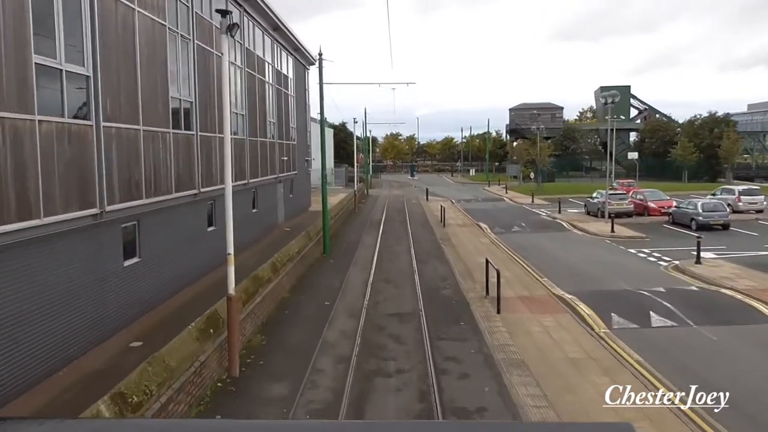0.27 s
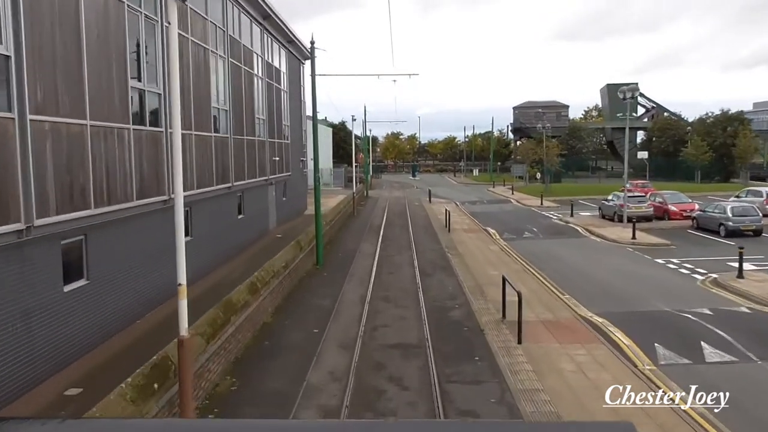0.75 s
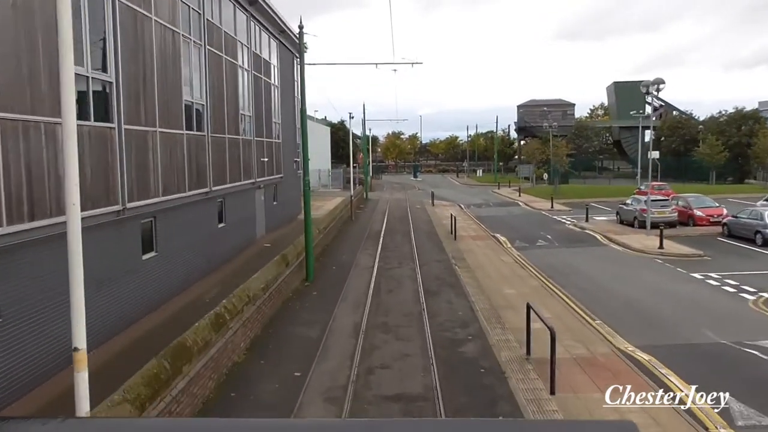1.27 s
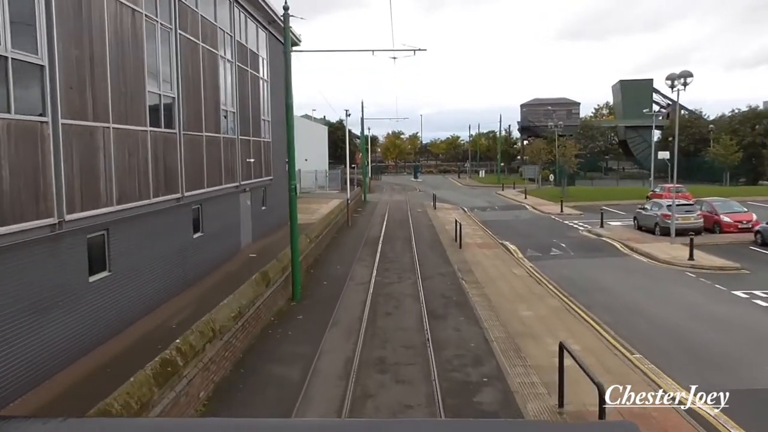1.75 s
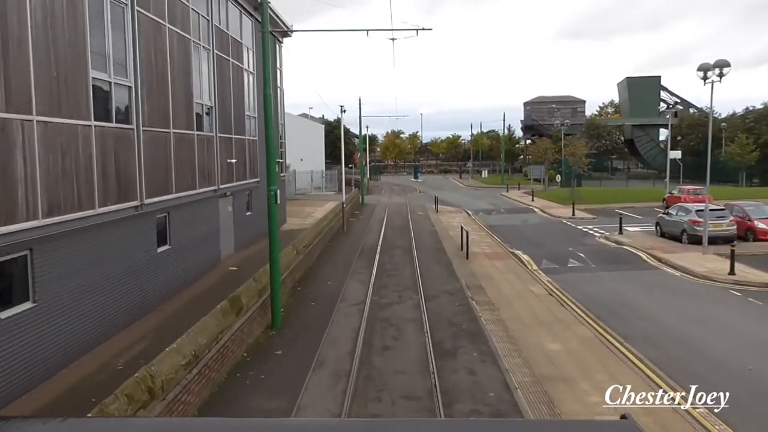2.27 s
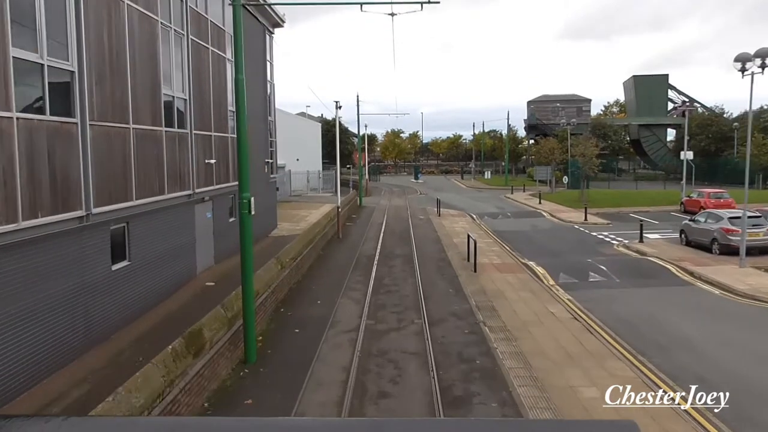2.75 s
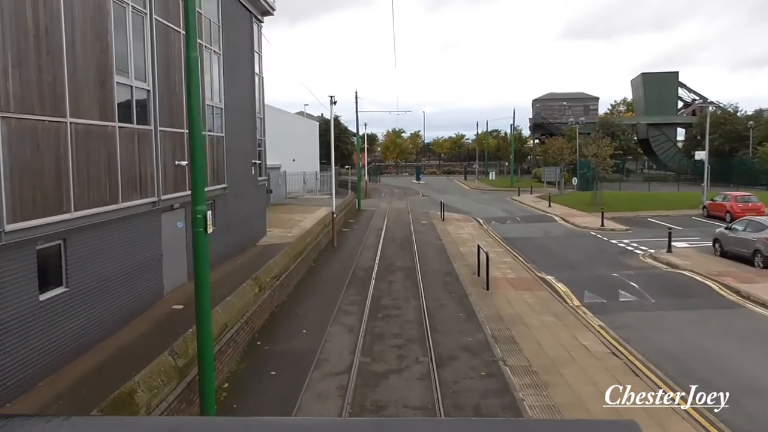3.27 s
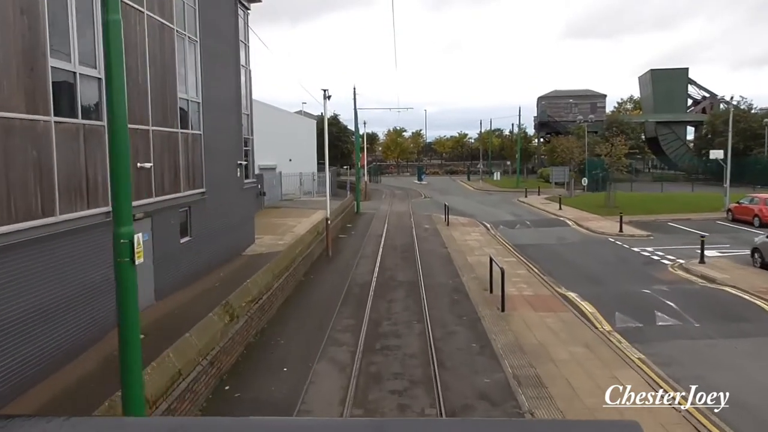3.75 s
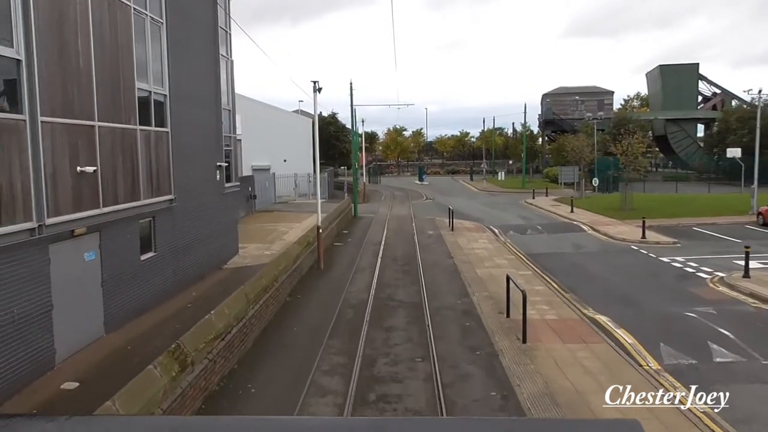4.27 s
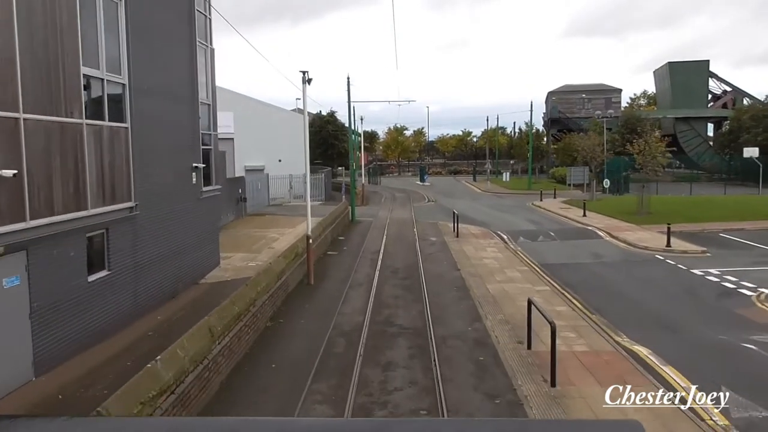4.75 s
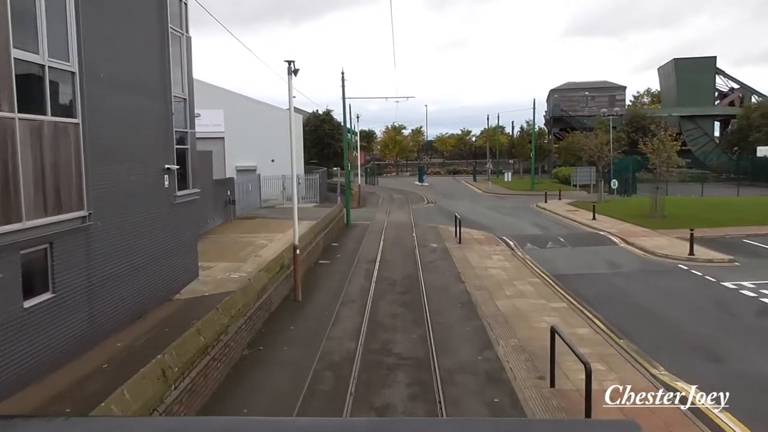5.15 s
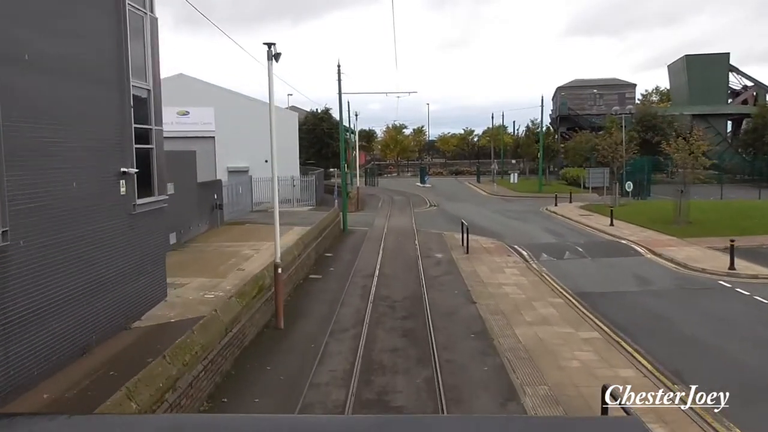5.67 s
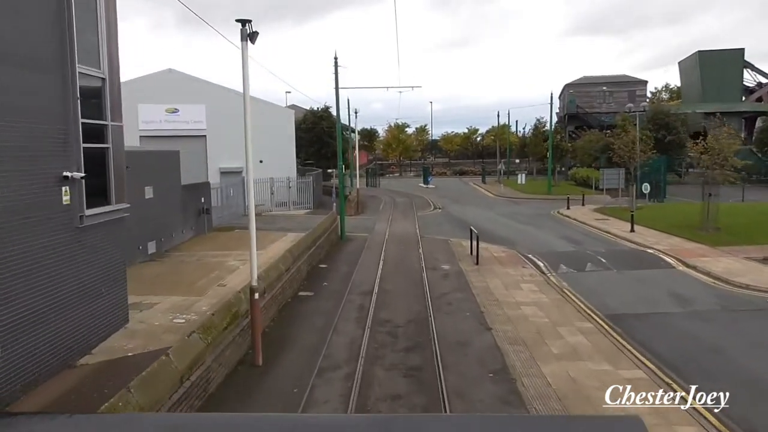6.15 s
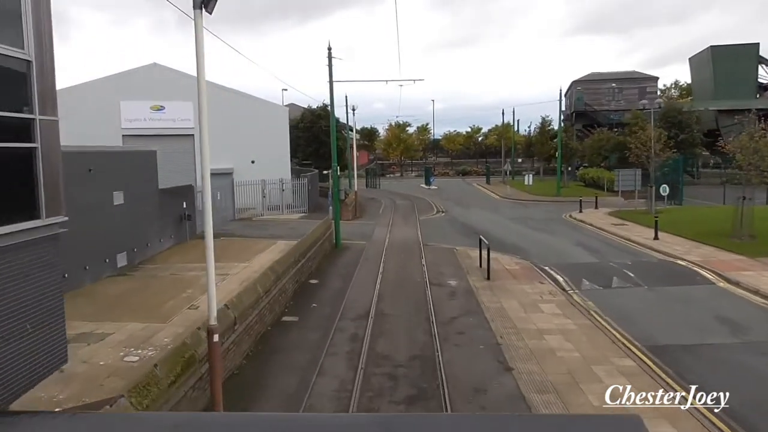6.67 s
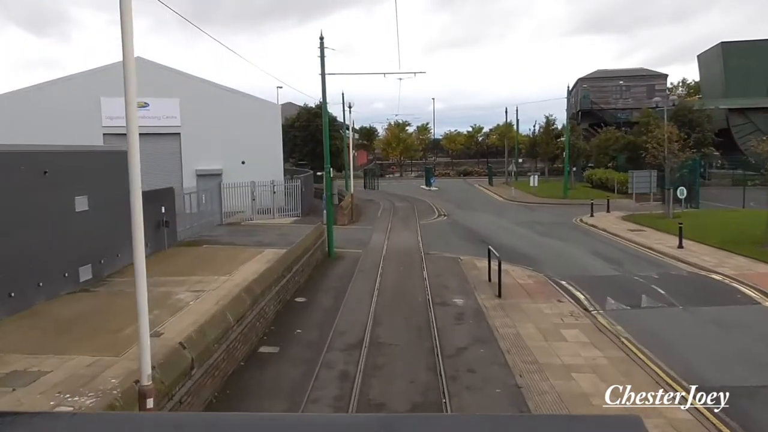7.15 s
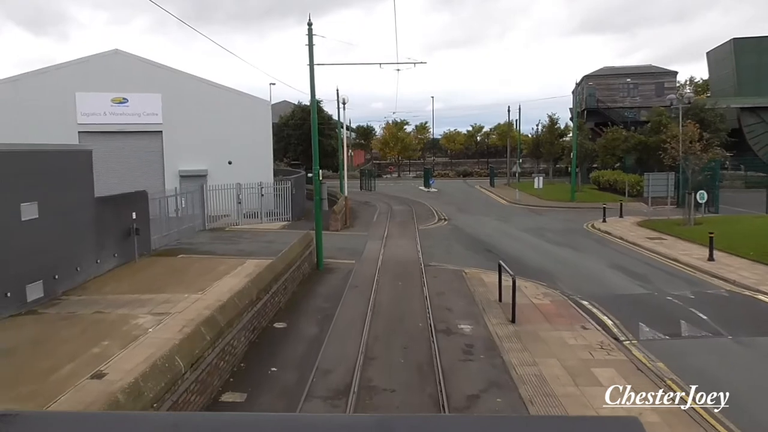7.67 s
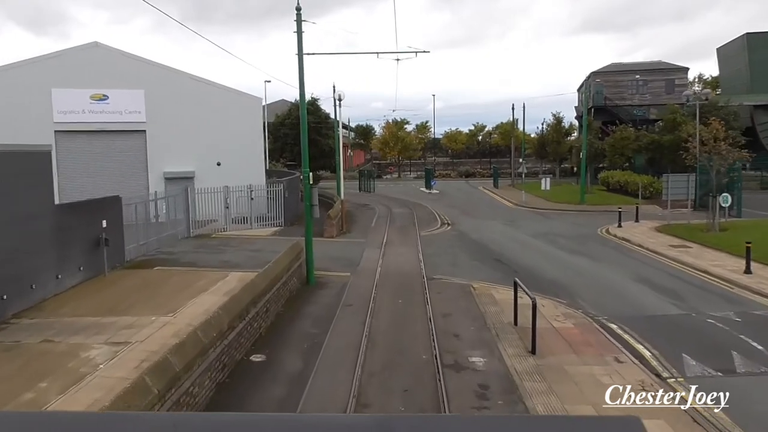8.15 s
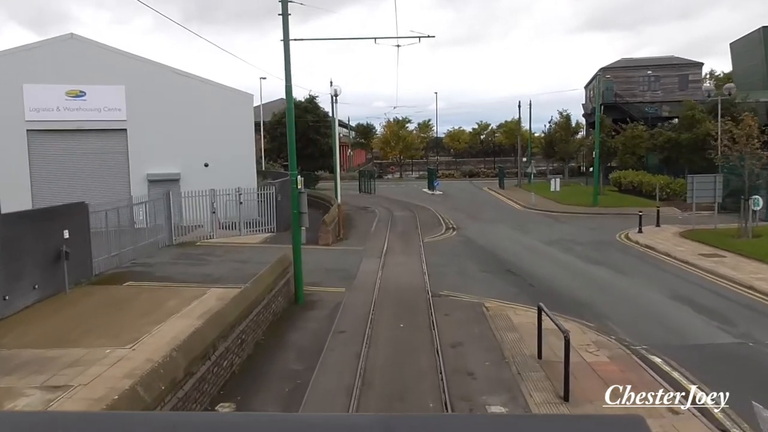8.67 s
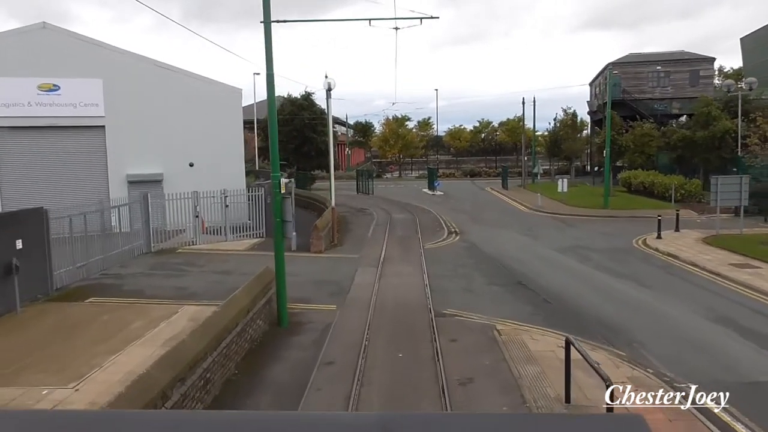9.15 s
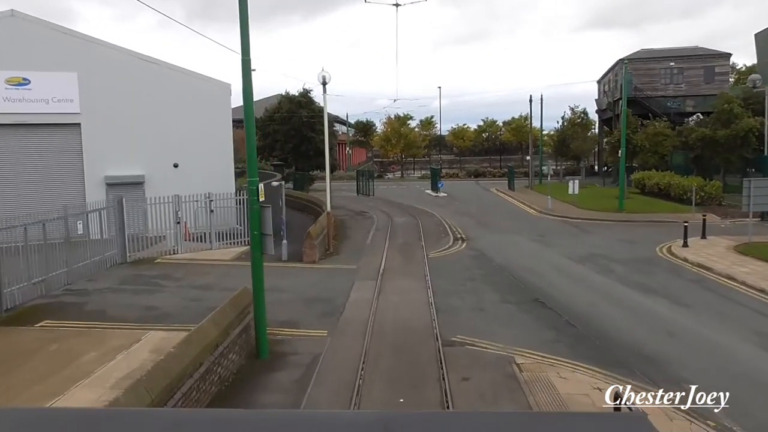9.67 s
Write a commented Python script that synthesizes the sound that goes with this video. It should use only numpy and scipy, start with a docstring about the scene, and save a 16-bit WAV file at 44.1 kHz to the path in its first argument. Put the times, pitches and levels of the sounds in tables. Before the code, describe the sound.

Aboard an electric tram on street track. A low, rough rumble and wheel roar run throughout under a thin hiss from flanges and overhead collector. Thumps come irregularly, with strong clattering jolts near one and a half, five and five and a half seconds. Brief hollow metal tones sing out. Near the end the rolling drops and a cluster of knocks follows. Close onboard microphone, mostly central, its level dipping after big jolts.

```python
"""On board an electric tram rolling along street track.
Rough rail shakes the truck (the wheel frame) and floor: boom, rumble, roar and ringing tones made from random clicks
and noise. Flanges and the current collector hiss, and the wire ticks. Bumps are short dying sine tones;
clatter and cracks are noise bursts; brief sliding tones stand out of the rolling noise.
Jolts swell the rolling sounds; after strong ones the recorder's automatic gain briefly lowers the level."""
import sys
import numpy as np
from scipy import signal
from scipy.fft import rfft, irfft, next_fast_len
from scipy.io import wavfile
from scipy.ndimage import uniform_filter1d

SR = 44100
rng = np.random.default_rng(int(sys.argv[2]) if len(sys.argv) > 2 else 0)


def wav_record(signal):
    """Record a signal, one row per channel, as 16-bit PCM in the file named by sys.argv[1]."""
    frames = np.transpose(np.atleast_2d(signal))
    bounded = np.clip(frames, -1, 1)
    # unit amplitude maps onto the largest positive 16-bit level
    quanta = np.round(bounded * 32767).astype(np.int16)
    wavfile.write(sys.argv[1], SR, quanta)


def to_linear_factor(level_db):
    """Convert decibel levels (scalar or array-like) to linear amplitude factors."""
    exponent = np.asarray(level_db, float) / 20
    return 10 ** exponent


N = 437472   # length in samples


def rms_one(x):
    """Scale to unit rms."""
    return x / np.sqrt(np.mean(x ** 2) + 1e-20)


def in_time(rows):
    """Turn each column of a time table into a curve, sample by sample."""
    s, *columns = np.transpose(rows)
    return [np.interp(np.arange(N) / SR, s, column) for column in columns]


def at_hz(points, hz):
    """Read a frequency table on a log-frequency axis."""
    table_hz, table_db = np.transpose(points)
    return np.interp(np.log(hz), np.log(table_hz), table_db)


def swell(t, s, db, length):
    """A bell-shaped change in level, in dB, centred on s."""
    return db * np.exp(-((t - s) / length) ** 2)


def drift(rate):
    """Slow random wandering of spread 1: noise through a two-pole low-pass at rate (Hz)."""
    r = np.exp(-80 * np.pi * rate / SR)   # worked out at every 40th sample
    noise = rng.standard_normal(N // 40 + 2002)
    slow = signal.lfilter([1], [1, -2 * r, r * r], noise)[2000:]
    return np.interp(np.arange(N) / 40, np.arange(len(slow)), rms_one(slow))


def grit(per_s, spread_db):
    """Tiny rough spots under a wheel or shoe: random clicks of uneven size."""
    sizes = to_linear_factor(spread_db * np.minimum(rng.exponential(1, N), 5)) * rng.standard_normal(N)
    hit = rng.random(N) < per_s / SR
    return sizes * hit


# How much weaker the stereo side is than the middle while the image is open: (f/Hz, level/dB)
SIDE_LEVEL = [(60, -28), (110, -24), (200, -23.5), (380, -42), (700, -37), (1290, -29), (2380, -12),
              (4400, -10), (8120, -10), (15000, -7)]


def coloured(draw, spectrum, patchy_db, rate, count=6, tilt_db=0):
    """Mid and side clicks shaped by a spectrum, in bands that flicker partly together; mid rms 1."""
    size = next_fast_len(N)
    hz = np.maximum(np.arange(size // 2 + 1) * SR / size, 1)
    low_hz, high_hz = spectrum[0][0], spectrum[-1][0]
    inside = (hz > low_hz) & (hz < high_hz)
    colour_db = at_hz(spectrum, hz)
    mid = rfft(draw(), size) * to_linear_factor(colour_db) * inside
    side = rfft(draw(), size) * to_linear_factor(colour_db + at_hz(SIDE_LEVEL, hz)) * inside
    place = np.log(hz / low_hz) / np.log(high_hz / low_hz) * (count - 1)
    out, together = 0, drift(rate)
    for k in range(count):
        share = np.clip(1 - abs(place - k), 0, 1)   # neighbouring bands overlap
        flicker_db = patchy_db * (0.5 * together + drift(rate))
        band_tilt_db = tilt_db * (k / (count - 1) - .5)
        band = irfft([mid * share, side * share], size)[:, :N]
        out = out + to_linear_factor(flicker_db + band_tilt_db) * band
    return out / np.sqrt(np.mean(out[0] ** 2))


def sung(modes, levels_db, steady=0., waver_db=0., rate=2.25, sag_per_s=0.):
    """Noise twice through each narrow mode; a driven mode holds its strength more steadily than free noise."""
    out, t = 0, np.arange(N) / SR
    for (hz, width, offset_db), level_db in zip(modes, levels_db):
        r = np.exp(-np.pi * width / SR)
        a = [1, -2 * r * np.cos(2 * np.pi * hz / SR), r * r]
        once = signal.lfilter([1, 0, -1], a, rng.standard_normal(N))
        tone = rms_one(signal.lfilter([1, 0, -1], a, once))
        # pitch sinks as the car slows
        tone = np.interp(t - .5 * sag_per_s * t * (t - t[-1]), t, tone)
        strength = np.sqrt(uniform_filter1d(tone ** 2, size=600) + 0.026)
        evened = rms_one(tone / strength ** steady)
        out = out + to_linear_factor(level_db + offset_db + waver_db * drift(rate)) * evened
    return out


def dying_puffs(rows, offset_db, t60_s, low_hz, high_hz):
    """Band-limited noise that starts at each table row and dies by 60 dB in t60_s."""
    envelope = np.zeros(N)
    for s, db in rows:
        envelope[round(s * SR)] = to_linear_factor(db + offset_db)
    envelope = signal.lfilter([1], [1, -to_linear_factor(-60 / (t60_s * SR))], envelope + 1e-18)
    band = signal.butter(2, [low_hz, high_hz], "band", fs=SR, output="sos")
    return envelope * rms_one(signal.sosfilt(band, rng.standard_normal(N)))


# Jolts from joints and rough spots, each with the recorder's gain reduction after it:
# (t/s, swell level/dB, length/s, gain reduction setting/dB; below 0 means none)
JOLTS = [(0.132, 1.5, 0.047, -4), (0.268, 4.5, 0.029, 3.5), (0.437, 4, 0.039, 2.5), (0.783, 3, 0.05, -2),
         (1.474, 4, 0.072, 12.5), (1.932, 5, 0.04, 3.5), (2.482, 3, 0.037, 3.5), (2.708, 0, 0.025, 4.5),
         (3.13, -0.5, .03, -3), (3.426, 3.5, 0.027, -0.5), (3.512, 5, 0.013, -3), (3.624, 6, 0.028, -1.5),
         (3.758, 3.5, 0.018, 5), (4.303, 0, .04, -2.5), (4.474, 1.5, 0.024, -1.5), (4.79, 1.5, .03, 0.5),
         (5.094, 1.5, 0.04, 2.5), (5.54, -1, 0.031, -2), (6.048, 5.5, 0.012, 1), (6.2, 3, 0.037, 2.5),
         (6.366, 3.5, 0.038, 0.5), (6.78, -2, 0.025, 2), (6.916, 3, 0.049, 2), (7.32, 2.5, 0.033, -1.5),
         (7.47, 3, 0.023, 2), (7.654, 2.5, 0.02, -3.5), (8.145, 1.5, 0.025, 2.5), (8.31, -1, 0.024, 1.5),
         (8.457, 0.5, 0.028, -2.5), (8.586, 2.5, 0.069, 4.5), (8.766, 3, 0.038, -2.5), (8.954, 5, 0.036, 3),
         (9.07, 6, 0.033, -1.5), (9.154, 2, 0.026, 6), (9.275, 10.5, 0.049, -1.5), (9.39, 7, 0.074, -3),
         (9.556, 1, .03, 0), (9.718, 5.5, 0.012, -4), (9.778, 7.5, 0.03, 4.5)]


def jolts_and_recorder_gain(recovery_s=0.16):
    """Jolts swell the rolling; the recorder's gain sinks as the swell ends and recovers slowly; both in dB."""
    up, down, t = 0, 0, np.arange(0, N / SR, 1e-3)
    for s, swell_db, length, reduction_db in JOLTS:
        after = np.maximum(t - s, 0)
        up = up + swell(t, s, swell_db, length)
        onset = 1 - np.exp(-(after / length) ** 2)
        down = down - max(reduction_db, 0) * onset * np.exp(-after / recovery_s)
    return in_time(np.c_[t, up, down])


# Rolling before jolts and recorder gain:
# (t/s, floor rumble level/dB, wheel roar level/dB, rumble tilt/dB, roar tilt/dB)
# A tilt runs from the lowest to the highest band.
ROLLING = [(0, -17, -26, -14, -14), (.3, -17, -28.5, -1, 0), (.6, -19.5, -30, 0, 3),
           (1.3, -17, -27.5, 2, 7), (2.2, -18, -29.5, -4, 1), (3.1, -15, -26, -9, -4),
           (3.7, -19.5, -33, 9, 14), (4.4, -19, -30.5, 0, 1), (5, -17.5, -28.5, -5, -6),
           (5.8, -17, -27.5, 2, 3), (6.6, -17, -28, -2, 2), (7.4, -17, -27, -12, -1),
           (8.2, -18, -28.5, 2.5, 0), (8.8, -17.5, -30.5, -12, -2), (9.3, -25, -39, 6, -18),
           (9.6, -25, -40, -3, 9), (9.92, -18.5, -37, 0, -24)]


def rolling_levels(swell_db, gain_db):
    """Rough rail drives rumble and roar; jolts swell them, then the recorder's gain lowers them."""
    rumble_db, roar_db, rumble_tilt_db, roar_tilt_db = in_time(ROLLING)
    rumble_db = rumble_db + swell_db + gain_db
    roar_db = roar_db + 0.57 * swell_db + 0.79 * gain_db
    return rumble_db, roar_db, rumble_tilt_db, roar_tilt_db


# Sliding before recorder gain: (t/s, flange hiss level/dB, collector hiss level/dB)
SLIDING = [(0, -48.5, -54), (.5, -51, -58), (.8, -49, -52), (1.35, -49, -50.5), (1.7, -51, -52),
           (1.9, -51, -53), (2.7, -48.5, -54), (3.35, -48, -52), (3.76, -54.5, -58), (4.1, -53, -56.5),
           (4.6, -50, -51), (5.3, -50, -56), (5.75, -47.5, -54.5), (6.2, -46, -52.5), (6.45, -46, -51.5),
           (6.7, -47, -52.5), (6.95, -45, -51), (7.2, -44.5, -47.5), (7.45, -43, -47.5), (7.7, -46, -48.5),
           (7.95, -44.5, -48.5), (8.12, -48.5, -49.5), (8.3, -46, -51.5), (8.6, -46.5, -51.5),
           (8.85, -49, -53.5), (9.1, -54, -60.5), (9.6, -55.5, -59), (9.92, -55.5, -60.5)]


def sliding_levels(gain_db):
    """The recorder's gain lowers both hisses by a share of its full amount."""
    flange_db, collector_db = in_time(SLIDING)
    return flange_db + 0.66 * gain_db, collector_db + 0.63 * gain_db


# The deep heave of the body on its springs, before jolts and recorder gain: (t/s, level/dB)
HEAVE = [(0, -32.5), (2.4, -29), (3.1, -39), (3.6, -28.5), (4.6, -34.5), (6, -34.5), (7.9, -35.5),
         (8.15, -27), (9, -28.5), (9.5, -41), (9.92, -28)]
# Its colour: (f/Hz, relative level/dB per Hz)
HEAVE_COLOUR = [(13, -55), (22, -38), (65, -10.5), (100, -4.5), (130, -13), (220, -120)]


def heave(swell_db, gain_db):
    """The sprung body booms: clicks through a very low spectrum."""
    level_db = in_time(HEAVE)[0] + 1.03 * swell_db + gain_db
    return to_linear_factor(level_db) * coloured(lambda: grit(3000, 4.7), HEAVE_COLOUR, 0.75, 4.2, count=2)


# Colour of the floor rumble: (f/Hz, relative level/dB per Hz)
RUMBLE_COLOUR = [(56, -50), (95, -12), (129, -1), (307, -0.5), (354, -4.5), (394, -8), (432, -7.5),
                 (520, -15), (680, -18.5), (1140, -120)]


def rumble(level_db, tilt_db):
    """Rough rail shakes the floor: low clicks whose tilt changes with time."""
    noise = coloured(lambda: grit(3000, 2.27), RUMBLE_COLOUR, 0.68, 12.0, count=7, tilt_db=tilt_db)
    return to_linear_factor(level_db) * noise


# Colour of the wheel roar: (f/Hz, relative level/dB per Hz)
ROAR_COLOUR = [(260, -48), (450, -6), (523, -7.5), (662, -2.5), (979, -8), (1530, -17.5), (1620, -29),
               (1900, -33.5), (2500, -40), (4200, -110)]


def roar(level_db, tilt_db):
    """Wheels roar over rough rail: low and middle clicks whose tilt changes with time."""
    noise = coloured(lambda: grit(3500, 1.52), ROAR_COLOUR, 0.55, 12.0, count=5, tilt_db=tilt_db)
    return to_linear_factor(level_db) * noise


# Colour of the flange hiss: (f/Hz, relative level/dB per Hz)
FLANGE_COLOUR = [(970, -8.5), (1650, -2), (2000, -3), (2400, -4.5), (2900, -8.5), (3750, -7), (4450, -10),
                 (4830, -12.5), (5300, -13), (6500, -19), (8600, -26), (14000, -110)]


def flange_hiss(level_db):
    """Wheel flanges slide along the rail: dense clicks heard as a hiss."""
    return to_linear_factor(level_db) * coloured(lambda: grit(12000, 0.53), FLANGE_COLOUR, 1.0, 10.5, count=5)


# Colour of the collector hiss: (f/Hz, relative level/dB per Hz)
COLLECTOR_COLOUR = [(3650, -13), (6200, -8), (6570, -9), (7090, -1), (8070, 2), (9770, -6.5), (10600, -4),
                    (11700, -4), (13500, -12), (15500, -21)]


def collector_hiss(level_db):
    """The current collector slides along the wire: very dense, high clicks."""
    return to_linear_factor(level_db) * coloured(lambda: grit(30000, 0.99), COLLECTOR_COLOUR, 0.81, 24.0, count=6)


# The truck's low and high ringing modes: (f/Hz, width of one filter pass/Hz, level offset/dB)
TRUCK_MODES = [(393, 18.8, -0.5), (968.6, 19, -2.5)]
# How strongly the low mode sings, before its offset: (t/s, level/dB)
RINGING = [(0.0, -43), (0.02, -29), (0.25, -27.5), (0.33, -38), (0.58, -22), (0.63, -39), (0.69, -37),
           (0.83, -25), (0.88, -41), (0.96, -16.5), (1.05, -29.5), (1.41, -26), (1.68, -32), (1.74, -21),
           (1.79, -33), (2.15, -22.5), (2.32, -32.5), (2.51, -23.5), (2.73, -25), (2.79, -37), (3.12, -19),
           (3.26, -27), (3.31, -22), (3.73, -31), (3.76, -17), (3.81, -53), (3.95, -31), (4.09, -40),
           (4.28, -19.5), (4.64, -33.5), (4.81, -16), (4.86, -41), (4.94, -19), (5.08, -38), (5.17, -22),
           (5.69, -34), (5.77, -18.5), (5.83, -27), (5.86, -12.5), (5.91, -35), (6.0, -29), (7.65, -29),
           (7.76, -28), (7.98, -38), (8.67, -30.5), (9.7, -52), (9.73, -26), (9.92, -39)]
# Now and then the high mode sings out: (t/s, extra level/dB, length/s)
HIGH_MODE_SWELLS = [(2.902, 12.5, 0.11), (5.1, 13, 0.036), (8.034, 7.5, 0.14), (8.42, 16.5, 0.048)]


def truck_ring(roar_db):
    """Two truck modes ring out of the rolling noise; the high one follows the roar."""
    t = np.arange(N) / SR
    high_db = roar_db - 13 + sum(swell(t, *row) for row in HIGH_MODE_SWELLS)
    # sag: share of pitch lost per second
    low = sung(TRUCK_MODES[:1], in_time(RINGING), steady=0.63, waver_db=1.0, rate=9.1, sag_per_s=.005)
    high = sung(TRUCK_MODES[1:], [high_db], steady=0.74, waver_db=2.5, rate=5.6)
    return low + high


# Ringing modes of the floor: (f/Hz, width of one filter pass/Hz, level over the rumble/dB)
FLOOR_MODES = [(117.5, 19, -12.5), (142.2, 22.6, -18), (209.4, 46, -12.5)]


def floor_ring(rumble_db):
    """Low floor modes ring with the rumble."""
    return sung(FLOOR_MODES, [rumble_db] * len(FLOOR_MODES), waver_db=2.0, rate=17.0)


# Lower and upper rail modes: (f/Hz, width of one filter pass/Hz, level over the flange hiss/dB)
RAIL_MODES = [(3710, 150, -16), (4840, 150, -18.5)]
# The lower rail mode rings out in short spells: (t/s, extra level/dB, length/s)
LOWER_RAIL_SWELLS = [(1.32, 12, .04), (1.847, 14, .04), (2.22, 11, .04), (2.45, 5, .08), (2.7, 6, .1),
                     (3.0, 2, .1), (3.3, 5, .12), (5.423, 8, .05), (9.67, 7, .03)]
# The upper rail mode wakes up on one stretch of rail: (t/s, extra level/dB)
UPPER_RAIL = [(0, 0), (5.4, -7), (5.9, 4), (8.7, 1), (9.1, -7)]


def rail_ring(flange_db):
    """Two high rail modes ring with the flange hiss."""
    t = np.arange(N) / SR
    lower_db = flange_db + sum(swell(t, *row) for row in LOWER_RAIL_SWELLS)
    upper_db = flange_db + in_time(UPPER_RAIL)[0]
    return sung(RAIL_MODES, [lower_db, upper_db], waver_db=-0.2, rate=13.0)


# Heavy bumps through the floor: (t/s, peak level/dB, f/Hz)
BUMPS = [(0.074, -11, 307), (0.121, -9.5, 406), (0.427, -11, 215), (0.864, -5, 191), (0.92, -12.5, 145),
         (1.041, -12, 130), (1.08, -13, 233), (1.286, -10, 200), (1.32, -9, 150), (1.376, -9, 137),
         (1.455, -4, 229), (1.472, 0, 285), (1.908, -16, 173), (1.928, -15, 298), (3.479, -7, 273),
         (3.507, -21, 200), (3.523, -5.5, 227), (3.582, -14, 245), (3.629, -17, 109), (3.713, -7, 130),
         (3.752, -5.5, 167), (3.897, -22, 253), (4.547, -8, 213), (5.128, -6.5, 238), (5.34, -21, 226),
         (5.529, -2, 250), (6.044, -11, 250), (6.165, -13, 277), (6.694, -13, 348), (6.768, -4.5, 264),
         (6.921, -15, 230), (7.324, -7, 230), (7.37, -12, 238), (8.126, -4, 207), (8.449, -12, 251),
         (8.699, -7, 330), (8.938, -13, 137), (9.006, -9, 224), (9.043, -10, 240), (9.081, -3.5, 193),
         (9.132, -10, 169), (9.271, -12, 300), (9.288, -15, 201), (9.379, -16, 218), (9.42, -17, 260),
         (9.551, -15, 240), (9.615, -13.5, 260), (9.714, -11, 164), (9.738, -11, 300), (9.767, -19, 230),
         (9.784, -6, 208)]


def bumps(cycles=1.5, rise=0.97):
    """Each bump is a soft push that rings the floor for a few cycles."""
    out, t = np.zeros(N), np.arange(SR // 8) / SR
    for s, db, hz in BUMPS:
        onset = 1 - np.exp(-t * hz / rise)   # rise in cycles
        decay = to_linear_factor(-60 * t * hz / (4 * cycles))
        shape = onset * decay * np.sin(2 * np.pi * hz * t)
        i = round(s * SR)
        out[i:i + len(t)] += (to_linear_factor(db) * shape / abs(shape).max())[:N - i]
    return out


# Sharp cracks of steel on steel: (t/s, approximate peak level/dB)
CRACKS = [(1.4594, -41), (5.03, -39), (5.055, -35), (5.0764, -27), (5.4541, -39), (5.5333, -33),
          (8.929, -40), (9.0791, -41), (9.1086, -47), (9.144, -33), (9.2468, -42), (9.2597, -43),
          (9.3046, -45), (9.363, -50), (9.4209, -48), (9.7356, -44), (9.7691, -36), (9.7964, -43)]


def cracks():
    """Very short dying puffs of upper-middle noise."""
    # a crack's peak stands 9.5 dB over its rms
    return dying_puffs(CRACKS, offset_db=-9.5, t60_s=0.025, low_hz=1500, high_hz=4400)


# Wheels over joints set the running gear clattering: (t/s, level/dB, extra treble level/dB, length/s)
CLATTER = [(1.464, -26.5, 0, 0.084), (1.847, -32, 4, 0.055), (1.887, -26.5, 1, 0.1), (1.913, -27, -3, 0.04),
           (2.002, -35, -4, 0.04), (2.22, -31.5, 7, 0.027), (2.938, -33, -13, 0.087),
           (3.707, -27.5, -9, 0.014), (3.745, -29, 0, 0.011), (3.8, -33, -4, 0.017),
           (5.046, -22.5, -6, 0.028), (5.059, -28.5, 5, 0.067), (5.108, -30, 1, 0.04),
           (5.128, -35, -3, 0.1), (5.475, -34, 6, 0.049), (5.515, -21, -2, 0.04), (5.536, -33, 5, 0.068),
           (5.575, -36, 2, 0.037), (5.63, -37, -6, 0.043), (6.478, -25, -4, 0.079), (8.69, -35, -8, .015),
           (8.748, -35, -8, .015), (8.927, -25.5, -7, 0.02), (8.955, -36, 4, 0.032), (9.04, -39, -8, 0.025),
           (9.073, -33, -4, 0.017), (9.138, -34, 1, 0.009), (9.229, -29, -14, 0.04),
           (9.262, -29.5, -11, 0.022), (9.3, -46, -8, .015), (9.352, -35, -12, 0.022),
           (9.413, -33, -10, 0.011), (9.487, -34, 2, 0.05), (9.734, -31.5, -10, 0.017),
           (9.756, -35, -2, 0.011), (9.79, -37, -10, 0.01)]
# Colour of the clatter: (f/Hz, relative level/dB per Hz)
CLATTER_COLOUR = [(300, 6.5), (900, 2.5), (1500, -10), (1700, -17.5), (2400, -24.5), (3500, -26.5),
                  (4800, -27.5), (6200, -32.5), (8000, -27.5), (10000, -37), (13000, -54)]
# Loose parts that ring in it: (f/Hz, width of one filter pass/Hz, level over the clatter noise/dB)
GEAR_MODES = [(735, 190, -9.5), (1038, 260, -10.5), (1400, 220, -16), (1980, 110, -26.5),
              (2340, 320, -27.5), (3700, 640, -31), (4900, 300, -41), (7520, 460, -43)]


def clatter(rise=0.32, split_hz=2500, tail_db=-11.0, tail=2.9):
    """Bursts of loose metal contacts: a swell and a fall with a weaker tail, each with its own brightness."""
    noise = coloured(lambda: grit(5000, 2.1), CLATTER_COLOUR, 1.65, 30.0, count=10)
    noise[0] += sung(GEAR_MODES, [0] * len(GEAR_MODES), steady=0.45, waver_db=2.0, rate=12.0)
    high_pass = signal.butter(2, split_hz, "high", fs=SR, output="sos")
    treble = signal.sosfilt(high_pass, noise)
    body, edge, t = np.zeros(N), np.zeros(N), np.arange(SR // 2) / SR
    for s, db, treble_db, length in CLATTER:
        onset = 1 - np.exp(-(t / (rise * length)) ** 2)
        fall = np.exp(-(t / length) ** 2) + to_linear_factor(tail_db) * np.exp(-t / (tail * length))
        shape = to_linear_factor(db) * onset * fall
        i = round(s * SR)
        body[i:i + len(t)] += shape[:N - i]
        edge[i:i + len(t)] += (to_linear_factor(treble_db) - 1) * shape[:N - i]
    return body * noise + edge * treble


# Thin ticks at the wire: (t/s, starting level/dB)
TICKS = [(3.115, -56), (5.149, -58), (5.532, -52), (5.622, -48), (5.639, -55)]


def ticks(hz=12600):
    """Tiny dying puffs of very high noise."""
    return dying_puffs(TICKS, offset_db=0, t60_s=.02, low_hz=hz * .85, high_hz=hz * 1.15)


# Brief tones that stand out of the rolling noise: (middle t/s, length/s, start f/Hz, end f/Hz, level/dB)
PASSING_TONES = [(4.449, 0.086, 325, 324, -23), (5.683, 0.053, 595, 586, -29.5),
                 (6.5, 0.1, 488, 469.6, -30), (6.72, .12, 454, 438.5, -25.5), (7.16, .11, 985, 975, -36),
                 (7.551, .1, 593, 591, -34.5), (8.351, .1, 613, 601, -37), (9.05, .04, 600, 586, -34),
                 (9.28, .04, 560, 542, -33), (9.574, .07, 975, 965, -41), (9.76, .04, 560, 540, -36),
                 (9.87, .015, 624, 604, -41), (9.9, .012, 700, 650, -38)]


def passing_tones(waver=0.014, flutter_db=1.5, rate=30.0):
    """Each is an unsteady tone that swells, slides a little and fades."""
    out = np.zeros(N)
    wobble = 1 + waver * drift(rate)
    flutter = to_linear_factor(flutter_db * drift(rate))
    for s, length, start_hz, end_hz, db in PASSING_TONES:
        first = max(round((s - 3 * length) * SR), 0)
        last = min(round((s + 3 * length) * SR), N)
        i = np.arange(first, last)
        u = (i / SR - s) / length
        hz = np.interp(u, [-1, 1], [start_hz, end_hz]) * wobble[i]
        tone = np.sin(2 * np.pi * np.cumsum(hz) / SR)
        out[i] += np.sqrt(2) * to_linear_factor(db) * np.exp(-u ** 2) * flutter[i] * tone
    return out


def blinks(per_s):
    """A new chance value, held, so many times a second (200 at most)."""
    return rng.standard_normal(N // 200)[(np.arange(N) * min(per_s, 200) / SR).astype(int)]


# Stretches where the stereo image opens more readily: (from t/s, to t/s)
OPEN = [(.58, .78), (2.1, 2.3), (2.85, 3.55), (4.4, 4.55), (5.0, 6.1), (6.28, 6.58), (6.7, 6.85),
        (7.15, 8.0)]


def flickering_width(side, rate=43.0, lift=1.7, own=.9, treble_bar=.9, bass_bar=1.9, split_hz=1300):
    """The side signal blinks on and off in patches, the bass more rarely than the treble."""
    t, size = np.arange(N) / SR, next_fast_len(N)
    urge = lift * sum((t > a) & (t < b) for a, b in OPEN) + blinks(rate)
    edges = np.r_[30, 450, 800, np.linspace(split_hz, 14000, num=22)]   # Hz
    spectrum, hz, out = rfft(side, size), np.arange(size // 2 + 1) * SR / size, 0
    for low, high in zip(edges, edges[1:]):
        bar = treble_bar if low >= split_hz else bass_bar
        is_open = urge + own * blinks(rate) > bar
        gate = uniform_filter1d(1. * is_open, size=400)   # softened switching
        out = out + gate * irfft(spectrum * ((hz >= low) & (hz < high)), size)[:N]
    return out


def scene():
    """Mid and side are summed apart, then spread to left and right."""
    swell_db, gain_db = jolts_and_recorder_gain()
    rumble_db, roar_db, rumble_tilt_db, roar_tilt_db = rolling_levels(swell_db, gain_db)
    flange_db, collector_db = sliding_levels(gain_db)
    mid, side = (heave(swell_db, gain_db)
                 + rumble(rumble_db, rumble_tilt_db)
                 + roar(roar_db, roar_tilt_db)
                 + flange_hiss(flange_db)
                 + collector_hiss(collector_db)
                 + clatter())
    mid = mid + truck_ring(roar_db) + floor_ring(rumble_db) + rail_ring(flange_db)
    mid = mid + bumps() + cracks() + ticks() + passing_tones()
    side = flickering_width(side)
    return np.array([mid + side, mid - side])


def roll_off(x):
    """The treble ends steeply here."""
    return signal.sosfilt(signal.butter(12, 15620, fs=SR, output="sos"), x)


def record(dry):
    """Peaks are softly rounded to finish the mix."""
    mix = 0.92 * np.tanh(dry / 0.95)
    return roll_off(mix)


dry = scene()
out = record(dry)
wav_record(out)
```